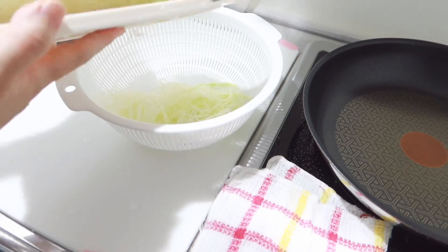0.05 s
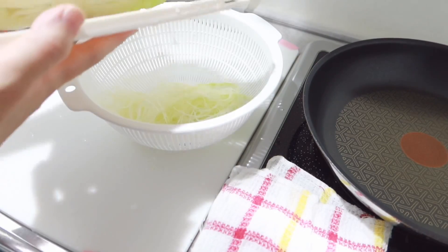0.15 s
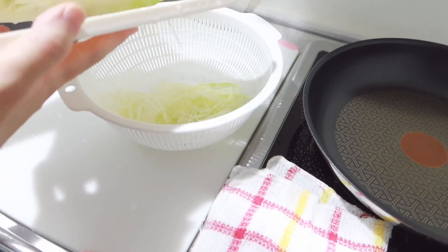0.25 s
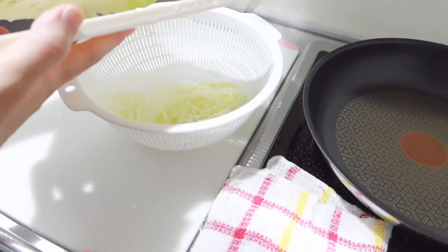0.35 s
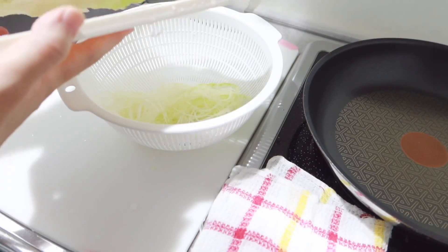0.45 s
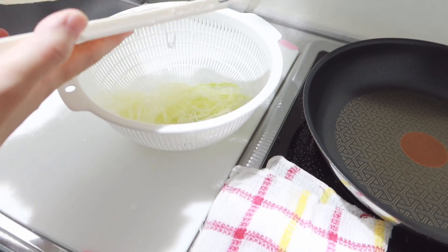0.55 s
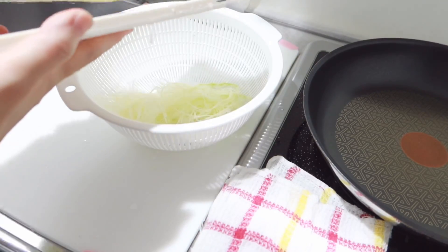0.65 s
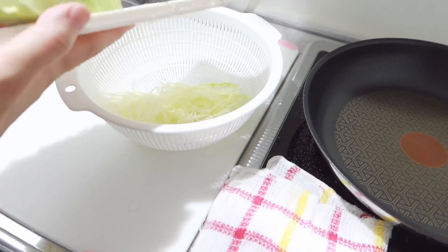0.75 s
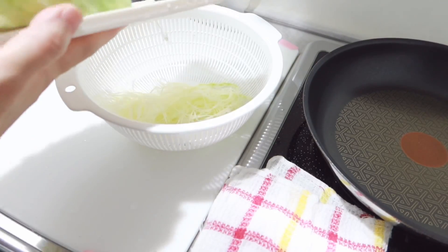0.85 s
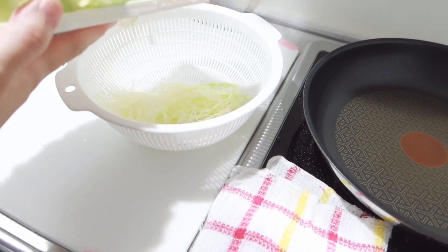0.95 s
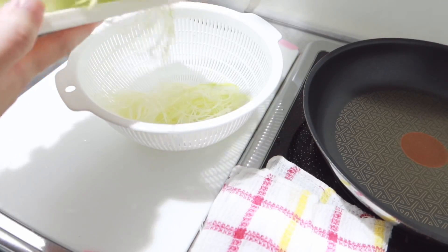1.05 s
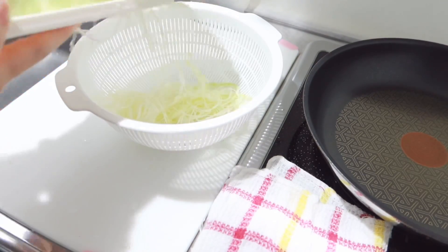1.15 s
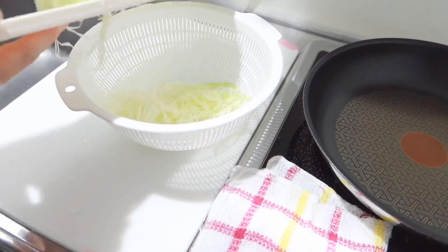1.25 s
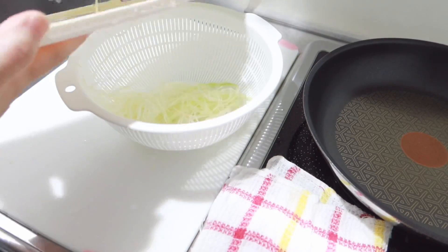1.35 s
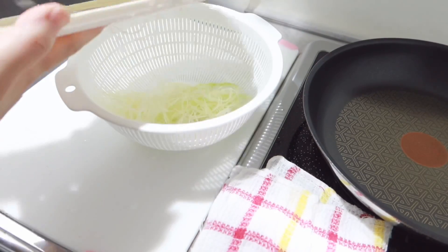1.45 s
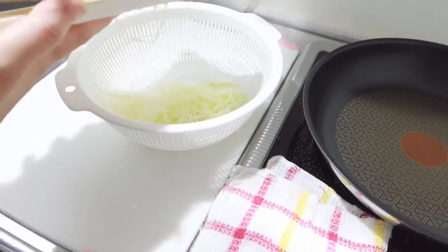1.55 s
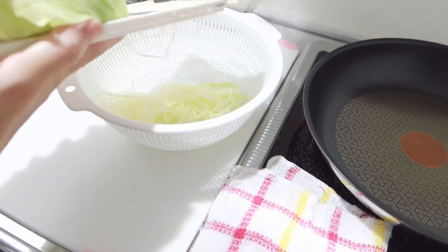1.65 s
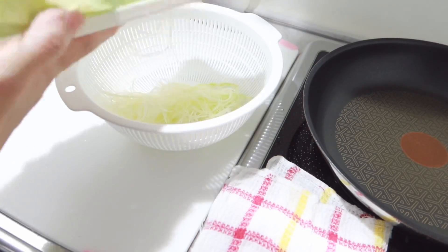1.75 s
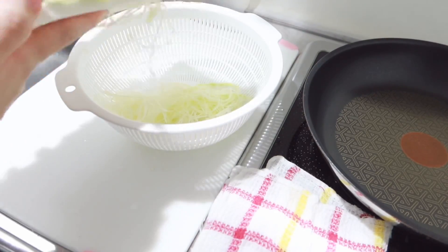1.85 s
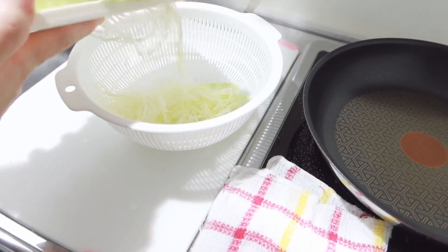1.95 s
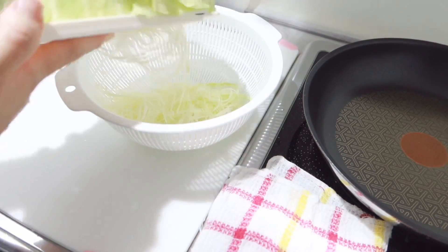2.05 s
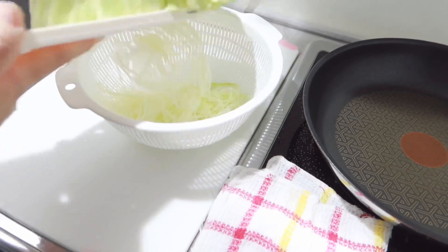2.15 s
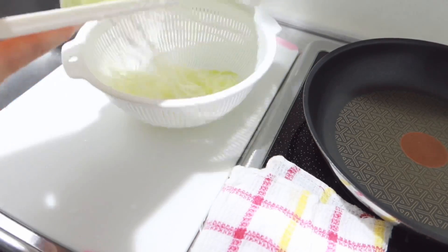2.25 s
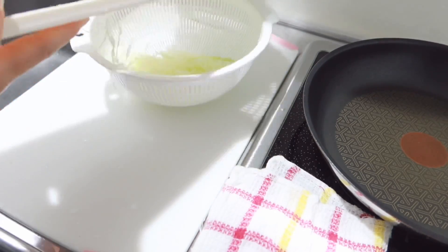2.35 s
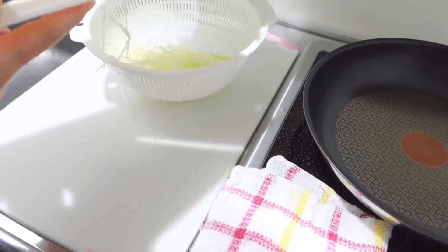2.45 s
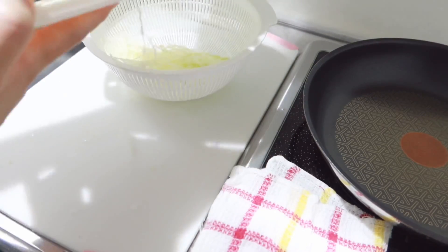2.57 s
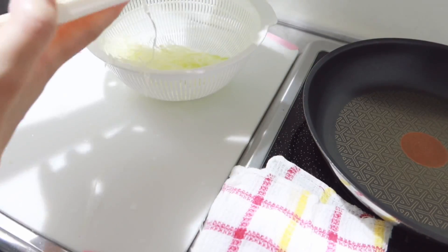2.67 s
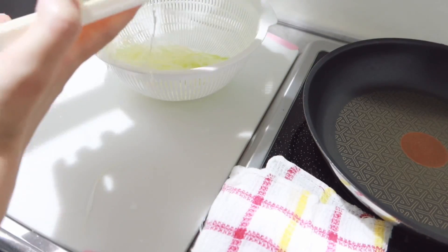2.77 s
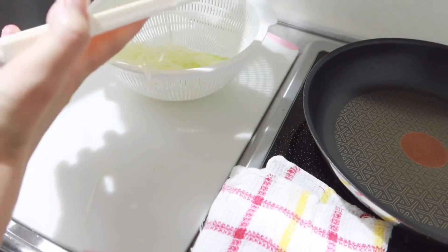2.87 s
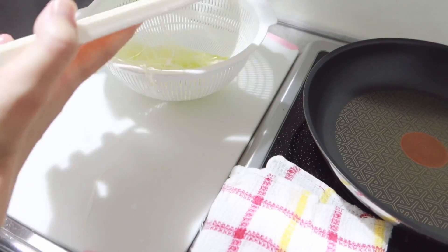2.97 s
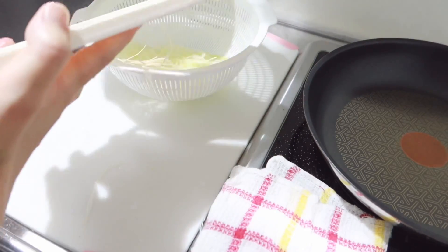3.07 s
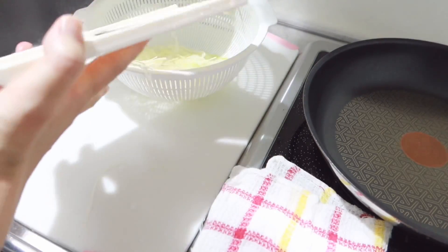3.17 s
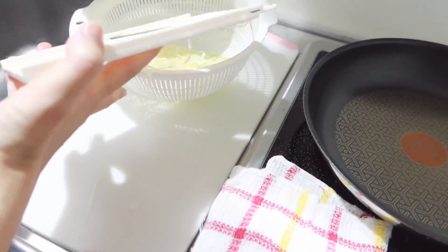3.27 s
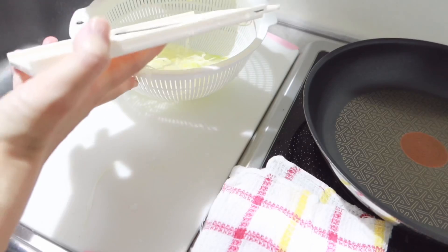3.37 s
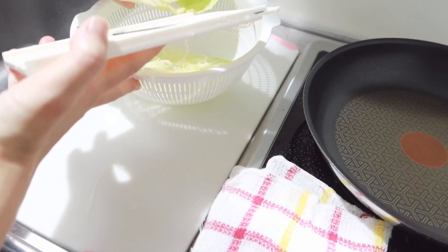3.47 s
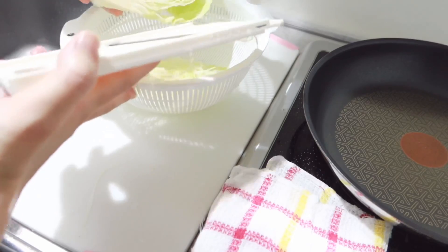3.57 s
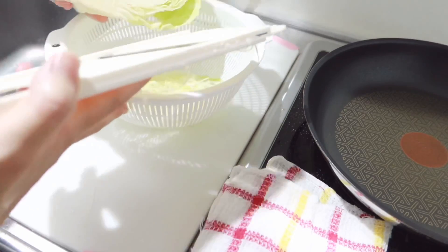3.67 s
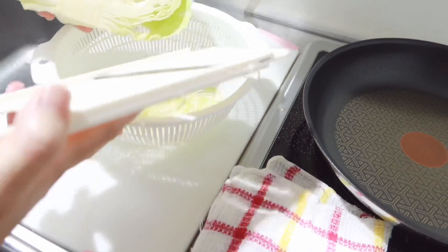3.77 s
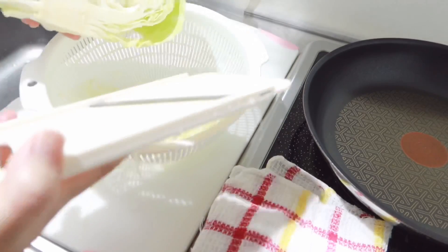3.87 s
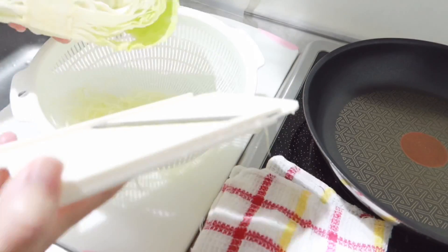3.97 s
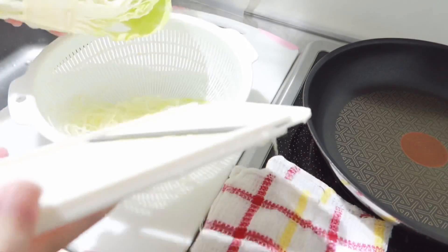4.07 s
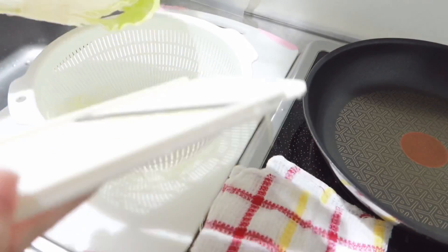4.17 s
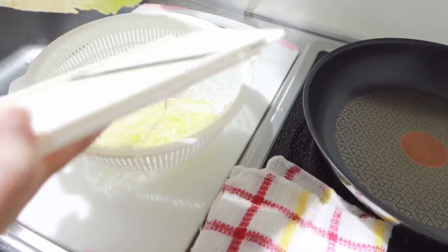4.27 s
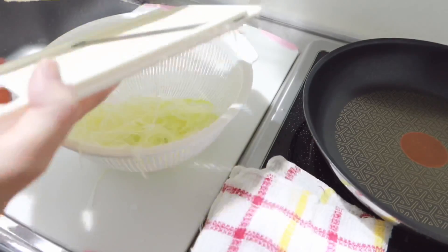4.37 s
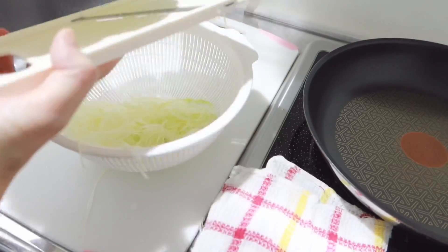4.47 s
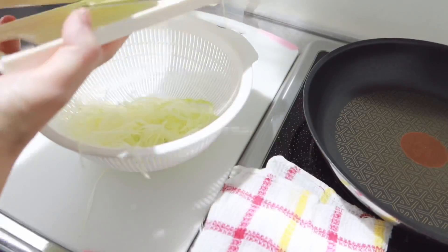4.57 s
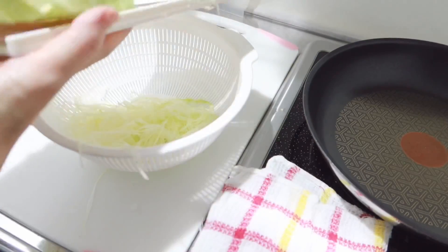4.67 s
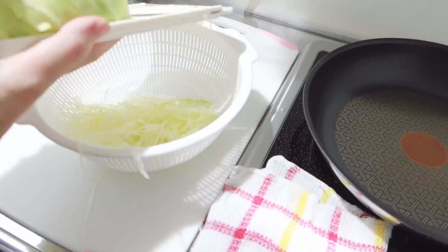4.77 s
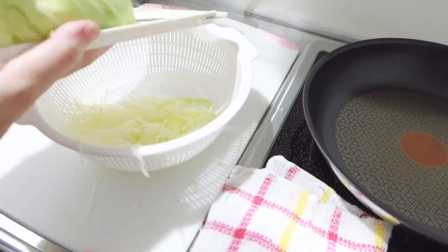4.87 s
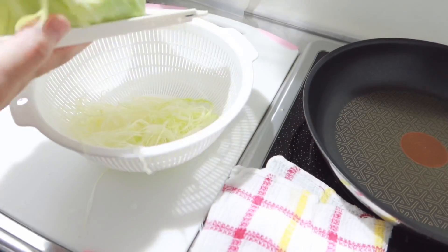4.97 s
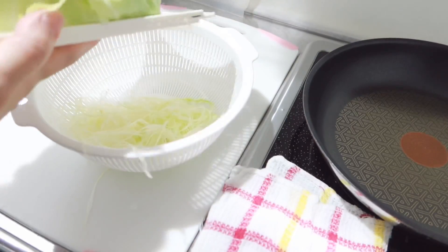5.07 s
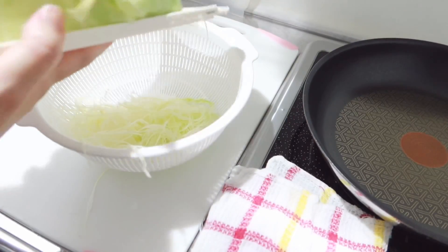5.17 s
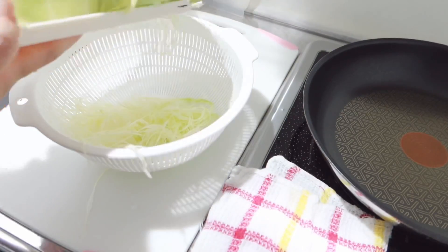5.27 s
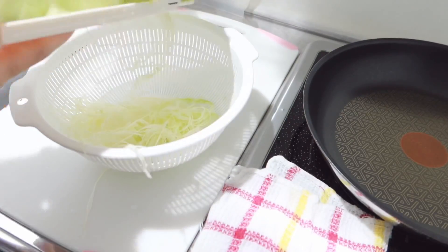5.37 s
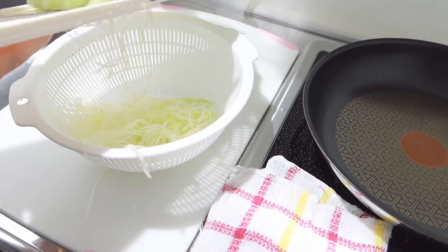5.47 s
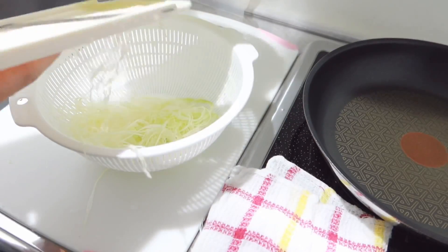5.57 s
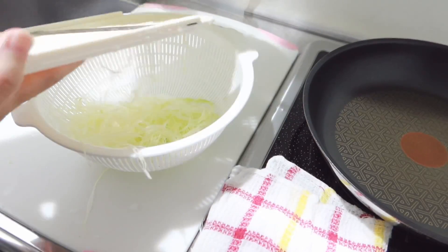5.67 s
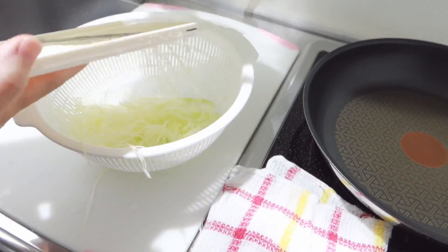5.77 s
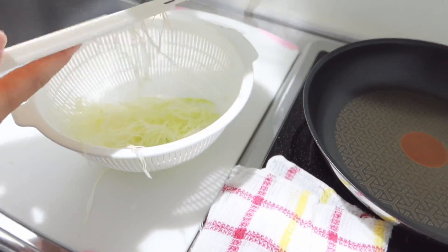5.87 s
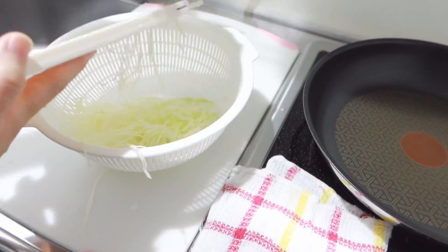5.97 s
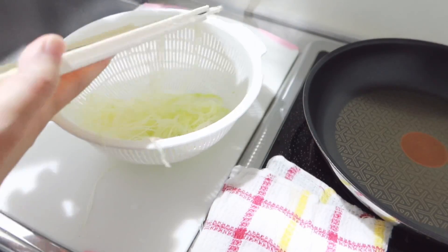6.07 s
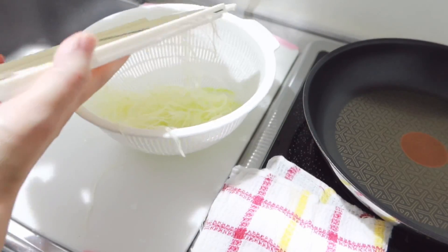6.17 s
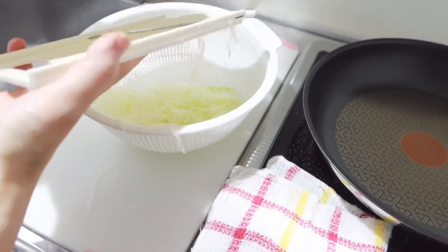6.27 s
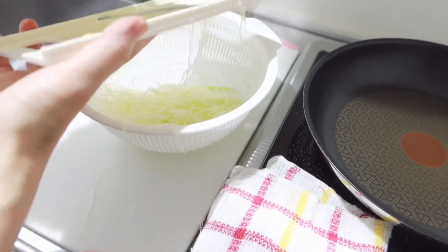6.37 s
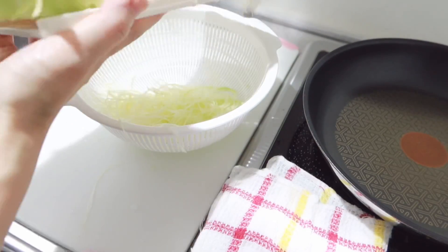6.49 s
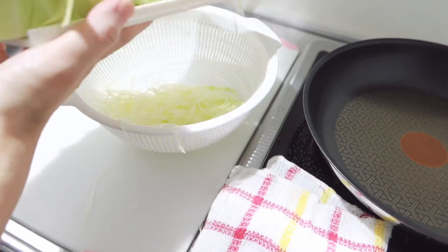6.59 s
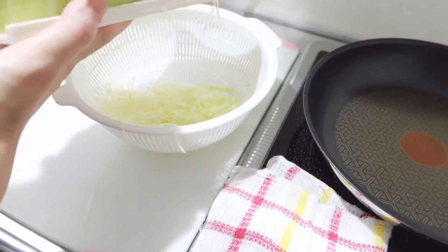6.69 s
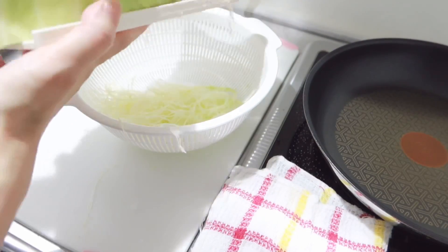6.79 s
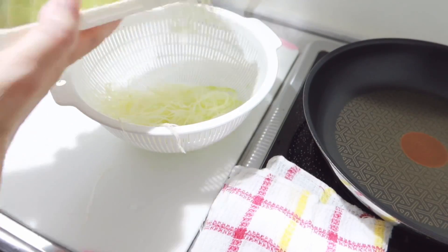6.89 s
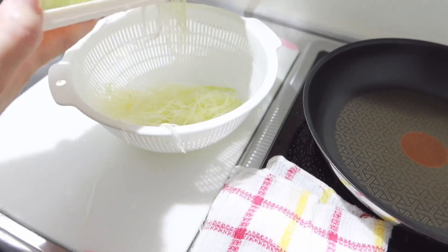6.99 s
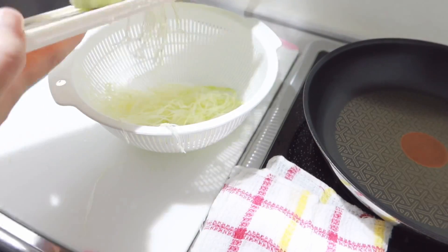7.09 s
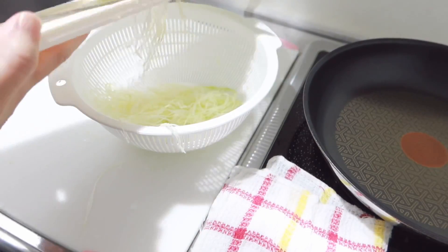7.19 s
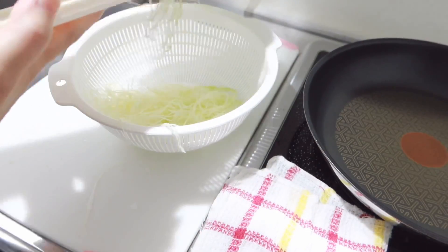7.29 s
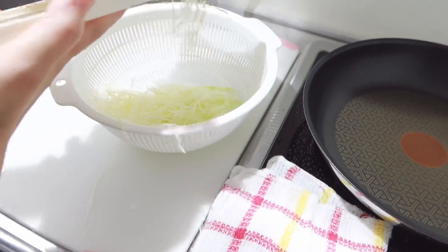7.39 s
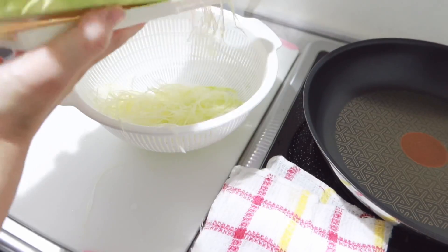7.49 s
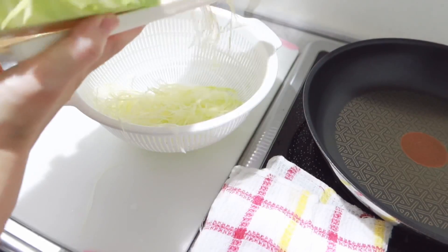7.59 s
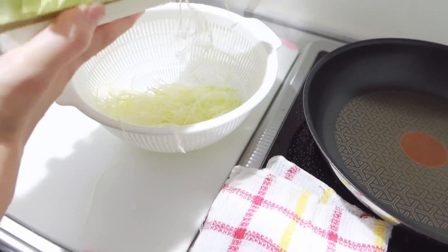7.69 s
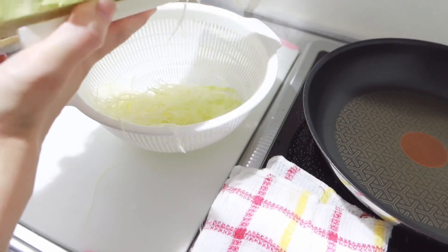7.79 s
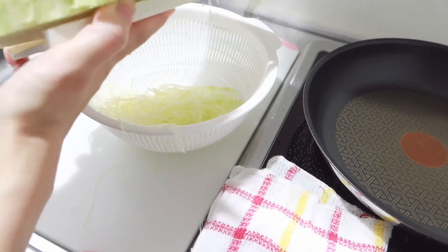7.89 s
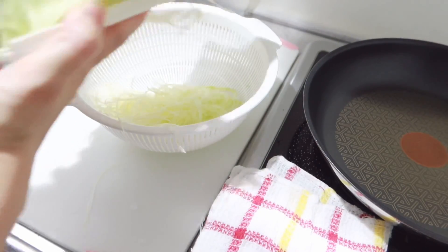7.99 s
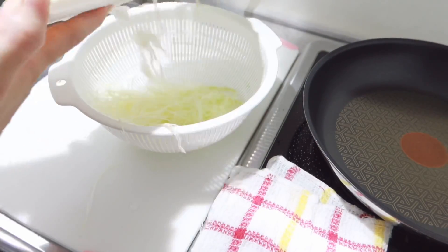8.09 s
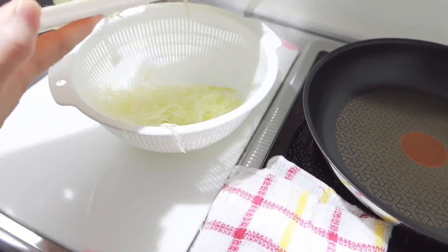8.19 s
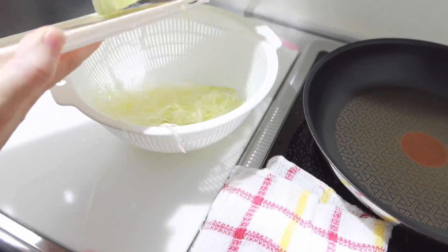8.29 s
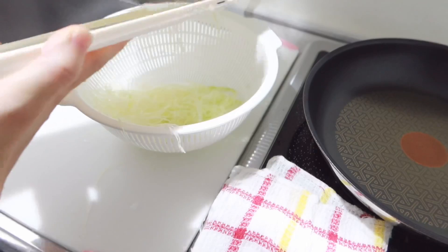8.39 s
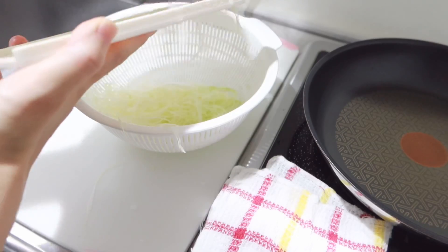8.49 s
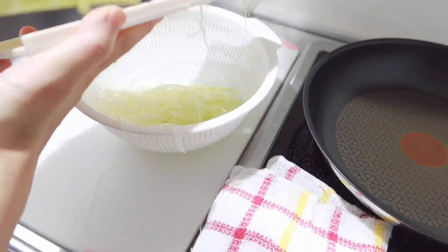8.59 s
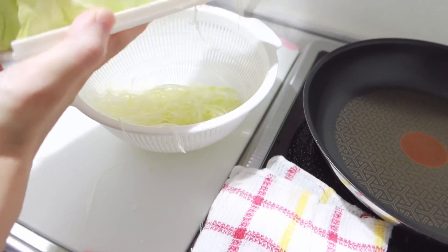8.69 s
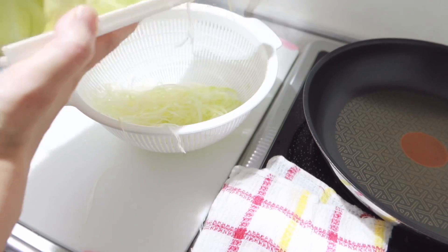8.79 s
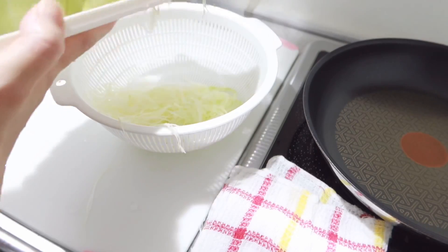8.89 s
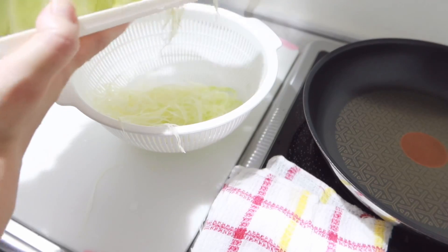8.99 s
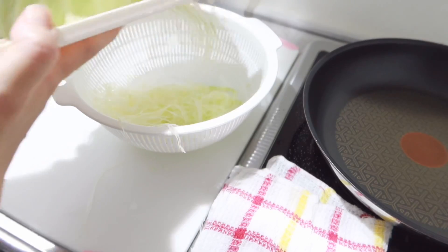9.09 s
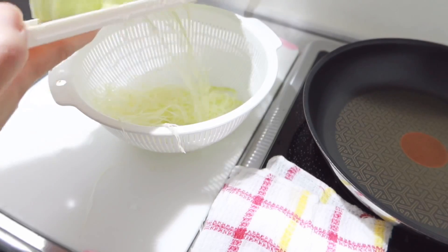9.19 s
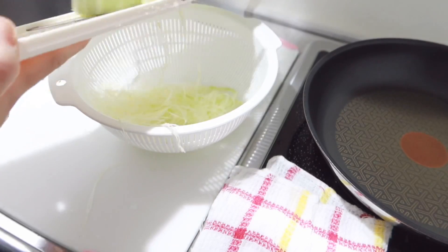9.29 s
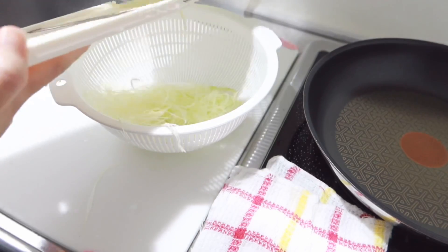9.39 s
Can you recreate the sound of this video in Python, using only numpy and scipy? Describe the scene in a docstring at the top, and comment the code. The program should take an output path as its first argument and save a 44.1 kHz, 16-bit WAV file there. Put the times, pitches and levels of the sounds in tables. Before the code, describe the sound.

Close crisp shredding of cabbage in irregular short strokes, cracks and squeaks, hollow plastic bowl slides between, in a quiet small kitchen.

```python
"""Slicing cabbage in a small kitchen

Cabbage is pushed in jerky strokes over the blade of a hand-held plastic slicer. Uneven bursts of clicks make
the tearing and hiss, and ring the slicer board dully. Leaves snap as short cracks and squeak as fluttering tones.
Now and then the plastic colander below scrapes over the counter: juddering clicks ring its bowl and rim.
A refrigerator-like hum of a few sine tones and shaped air noise fill the room."""
import sys
import numpy as np
from scipy import signal
from scipy.fft import rfft, irfft, next_fast_len
from scipy.io import wavfile
from scipy.ndimage import uniform_filter1d

SR = 44100
rng = np.random.default_rng(int(sys.argv[2]) if len(sys.argv) > 2 else 0)


def master(y):
    """Save y as 16-bit WAV."""
    cut = np.clip(np.atleast_2d(y).T, -1, 1)
    pcm = np.round(cut * 32767)  # scale
    wavfile.write(sys.argv[1], SR, pcm.astype(np.int16))


N = 416304  # length in samples

# Steady air noise. Each row: pitch in Hz, relative level in dB.
AIR_SPECTRUM = [(20, -26), (76, 1), (98, -11), (148, -6), (382, -8.5), (725, -16), (1230, -21),
                (1900, -20.5), (3000, -28), (11700, -45), (15500, -58)]
AIR_DB = -57
# How alike the air noise is at left and right. Each row: pitch in Hz, likeness (1 is the same).
AIR_LIKENESS = [(150, 1), (380, 0.8), (1000, 0.88), (2380, 0.74), (15000, 0.03)]
# Resonances in the air noise. Each row: pitch in Hz, width in Hz, lift in dB.
AIR_RINGS = [(1160, 160, 7.5), (1640, 38, 9.5)]
# Tones of the motor hum. Each row: multiple of the hum pitch, level in dB.
HUM_TONES = [(1, -63.5), (2, -68.5), (4, -74)]
HUM_HZ = 75.3
# Other faint, wavering tones. Each row: pitch in Hz, level in dB.
WAVERING_TONES = [(60, -71.5)]

# Leaf ribs that snap, and clacks of plastic in the hands.
# Each row: start in seconds, level in dB (before a common trim), pitch in Hz, time to fade by 60 dB in seconds.
SNAPS = [(0.004, -39.5, 5330, 0.086), (0.237, -41, 2390, 0.079), (0.351, -51.5, 1170, 0.12),
         (0.71, -33.5, 1590, 0.045), (0.777, -42, 2000, 0.08), (1.551, -37, 1710, 0.073),
         (1.742, -34, 550, 0.16), (1.776, -34, 1500, 0.068), (1.824, -32.5, 1200, 0.049),
         (2.014, -47, 3500, 0.061), (3.347, -49.5, 2000, 0.088), (3.987, -27.5, 1204, 0.072),
         (4.065, -38.5, 2600, 0.064), (4.295, -49, 2190, 0.03), (4.604, -50.5, 1640, 0.17),
         (4.661, -45.5, 1840, 0.17), (4.8, -35, 1500, 0.031), (4.821, -31.5, 1200, 0.09),
         (5.14, -23.5, 2540, 0.035), (5.959, -52, 4500, 0.055), (6.773, -24, 1490, 0.034),
         (7.914, -26.5, 1580, 0.27), (7.968, -26, 2730, 0.064), (8.601, -38, 2280, 0.15),
         (8.74, -27, 1790, 0.054)]
# Rings of a snapped rib. Each entry: ratio to its pitch.
SNAP_RATIOS = [.72, 1, 1.15, 2.08, 2.48]
# Leaves that squeak on the blade. Each row: start in seconds, level in dB, middle pitch in Hz,
# length in seconds, overtones in dB against the main tone, glide in octaves.
SQUEAKS = [(0.381, -53.5, 3720, 0.02, -20, -0.069), (0.876, -30, 330, 0.05, -26, 0.2),
           (1.237, -44, 1960, 0.024, -33, 0), (1.924, -49, 4250, 0.014, -30, 0),
           (1.982, -48.5, 2980, .017, -30, 0), (4.884, -38.5, 1493, 0.031, -3.5, 0),
           (4.945, -37, 3430, 0.014, -12.5, 0.04), (4.957, -32, 2100, 0.034, -4, 0.03),
           (4.978, -34.5, 2620, 0.02, -10, -0.4), (6.593, -34.5, 2360, 0.0087, -26, -0.3),
           (6.667, -37.5, 597, 0.028, -7, -0.016), (7.654, -32, 5140, 0.028, -7, -0.1),
           (8.157, -40.5, 1265, 0.042, -10, -0.035), (8.611, -32.5, 2320, 0.032, -16, -0.03),
           (9.036, -40.5, 6500, 0.014, -30, 0.13), (9.136, -38, 4410, 0.0087, -25, -0.9),
           (9.144, -32.5, 3040, 0.0094, -10, -0.25), (9.167, -39, 4880, 0.02, -9, -0.019)]

# Jerks of the cabbage over the blade. Each row: start in seconds, rise in seconds, run in seconds,
# cutting level in dB, change over the run in dB, weight on the board in dB against the cutting.
STROKES = [ (0.692, 0.0017, 0.069, -43.5, -14.5, -1.5), (0.76, 0.028, 0.083, -39.5, -9, -4),
           (0.784, 0.15, 0.24, -38, -14, -4), (1.14, 0.015, 0.11, -54, 3, 2),
           (1.546, 0.003, 0.027, -45.5, 2, -4.5), (1.587, 0.0088, 0.021, -42, -2, -5.5),
           (1.683, 0.0024, .15, -39.5, 4, -0.5), (1.85, 0.012, 0.12, -44.5, -3.5, -4.5),
           (2.052, 0.074, 0.12, -41.5, 1, -2.5), (2.22, 0.016, 0.083, -51.5, 1.5, -13),
           (4.749, 0.0029, 0.042, -44.5, -15, 2.5), (4.81, 0.03, 0.044, -44.5, -13, 3.5),
           (4.86, 0.036, 0.036, -37, -5.5, -5), (4.925, 0.067, 0.01, -38, -7, -6),
           (5.14, 0.0018, 0.051, -40, -2, 0.5), (5.19, 0.028, 0.21, -49.5, -3.5, -4),
           (5.33, 0.022, .12, -53, 2, 2), (6.414, 0.0037, 0.046, -46, -3, -4),
           (6.52, 0.011, 0.017, -40, -0.5, -4), (6.59, 0.042, 0.03, -40.5, -6, -3.5),
           (6.657, 0.008, 0.0076, -31.5, -10.5, -6), (6.774, 0.0015, 0.11, -36.5, -12, -4.5),
           (6.848, 0.032, 0.21, -56.5, 6.5, -3.5), (7.393, 0.073, 0.04, -47.5, -5.5, -5),
           (7.601, 0.001, 0.036, -41, -6.5, -2.5), (7.644, 0.022, 0.072, -33, -20.5, -6),
           (7.804, .012, 0.025, -49, 0.5, -7), (7.908, 0.026, 0.07, -32.5, -13, -4.5),
           (8.0, 0.034, 0.11, -51, 2.5, -6), (8.139, 0.049, 0.067, -48.5, 3, -5.5),
           (8.595, 0.0019, 0.022, -40, -3, -2), (8.63, 0.013, 0.063, -56, 1.5, -4),
           (8.742, 0.0022, 0.16, -46, 2, -7.5), (9.014, 0.0023, 0.032, -38.5, -6, -7),
           (9.05, 0.027, 0.2, -47, -1, -5.5), ]
STROKE_RISE_POWER, STROKE_STOP_S = 0.55, 0.019  # level grows as a power of time; fade when the push ends
# Sound of a tearing leaf. Each row: pitch in Hz, relative level in dB per Hz.
TEAR_SPECTRUM = [(410, -11), (700, -1.5), (818, -20), (1020, -0.5), (1710, 1), (4830, -6.5), (12000, -16.5),
                 (15500, -12.5)]
# Frame around the blade. Each row: pitch in Hz, width in Hz, relative level in dB.
FRAME_MODES = [(906, 40, 21.5), (1200, 13, 7), (1680, 34, 7), (2100, 600, 6.5)]
# Slicer board. Each row: pitch in Hz, width in Hz, relative level in dB.
BOARD_MODES = [(347.8, 9.9, 3.5), (410, 91, 5), (527.4, 93, 10.5), (687, 26, -4.5)]
# Lift of the treble of the bite through the scene. Each row: time in seconds, lift in dB.
TREBLE_LIFT = [(0.7, 0), (2.4, 0), (4.7, 3.5), (7.6, 1.5), (9.3, 3)]
BITE_PATCHES_DB, HISS_PATCHES_DB = 2.4, 2.6  # how much the colour shifts from leaf to leaf

# Bright ticks as the leaf edge catches the blade. Each row: start in seconds, peak level in dB.
TICKS = [(1.29, -48), (4.8255, -37), (7.726, -42), (7.8055, -33), (7.816, -31), (7.824, -33), (7.831, -34),
         (7.8715, -30), (7.892, -28), (7.907, -29)]
TICK_HZ, TICK_T60_S = 9000, 0.035  # main pitch; time for the driving noise to fade by 60 dB
# The cabbage bumps the board. Each row: start in seconds, level in dB, pitch in Hz.
KNOCKS = [(1.533, -35.5, 251), (4.801, -30, 260), (6.415, -29, 254), (8.595, -26, 455)]
KNOCK_T60_S = 0.037

# Slides of the colander. Each row: start in seconds, rise in seconds, run in seconds, rumble level in dB,
# scrape level of its feet in dB (before a common lift), boom pitch in Hz.
SLIDES = [(2.121, 0.14, 0.12, -37, -38, 211), (3.435, 0.15, 0.17, -43, -43.5, 206),
          (3.62, 0.089, 0.082, -47.5, -50.5, 243), (3.801, 0.056, 0.022, -43, -52, 157),
          (3.9, 0.094, 0.072, -40.5, -51.5, 148), (4.78, 0.11, 0.049, -41, -52, 199),
          (5.976, 0.12, 0.068, -39, -43, 223)]
RUMBLE_FADE_DB_PER_S, SCRAPE_FADE_DB_PER_S = -39, -97  # as the slide slows
SLIDE_RISE_POWER, RUMBLE_STOP_S, SCRAPE_STOP_S = 0.6, 0.05, 0.045
SCRAPE_PATCHES_DB, RIM_WANDER = 1.8, 0.025  # shifts of colour; typical sway of the rim pitch as a fraction
# Colander bowl on the counter. Each row: pitch in Hz, width in Hz, relative level in dB.
BOWL_MODES = [(321, 28, -2), (530, 34, 1.5)]
# Upper rings of the colander. Each row: pitch in Hz, width in Hz, relative level in dB.
RIM_MODES = [(985, 9.1, -1), (1170, 89, 4), (1640, 8.5, -5)]
# Grit under its feet. Each row: pitch in Hz, relative level in dB per Hz.
FEET_SPECTRUM = [(240, -0.5), (400, 4.5), (1170, -7), (1960, -6), (7670, -32), (15500, -64)]
# The colander settles. Each row: start in seconds, level in dB.
THUMPS = [(2.3, -38), (4.029, -42)]
THUMP_HZ = 64.6

# Sound off counter and walls. Each row: pitch in Hz, level in dB against the direct sound.
REFLECTED = [(100, -32), (300, -21), (1400, -25), (4000, -14), (9000, -9)]
# The left microphone port leads in the treble. Each row: pitch in Hz, lead in radians.
PORT_PHASE = [(2500, 0), (4400, .35), (7800, 1.1), (10500, 2.2), (14000, 3.1)]
PORT_WANDER_S, PORT_LEFT_DB = 19e-6, 0.5  # the lag between the ports shifts as the hands move; lift at left
# Treble of the microphone. Each row: pitch in Hz, level in dB.
MIC_TREBLE = [(11000, -1.5), (13500, -3.5), (15500, -40)]
EDGE_HZ = 15700  # little passes above this


def gain_of(db):
    """Turns decibels into a factor."""
    return 10 ** (np.asarray(db) / 20)


def evened(x):
    """Scales a signal to a typical size (rms) of 1."""
    return x / np.sqrt(np.mean(x ** 2) + 1e-20)


def read(points, hz):
    """Reads a table between its points, along log frequency."""
    f, value = np.transpose(points)
    return np.interp(np.log(hz + 1), np.log(f + 1), value)


def colour(x, spectrum):
    """Filters a sound by a spectrum in dB."""
    size = next_fast_len(x.shape[-1])
    gains = gain_of(read(spectrum, np.fft.rfftfreq(size, 1 / SR)))
    return irfft(rfft(x, size) * gains, size)[..., :x.shape[-1]]


def resonate(x, hz, width_hz):
    """A resonance of gain 1: shifts its pitch down to zero, smooths, and shifts back."""
    turn = np.exp(2j * np.pi * np.cumsum(hz * np.ones(len(x))) / SR)
    r = np.exp(-np.pi * abs(width_hz) / SR)
    smooth = signal.lfilter([1 - r], [1, -r], x / turn + 1e-18)
    return 2 * (turn * smooth).real


def body(x, modes):
    """An object rings as a sum of resonances."""
    return evened(sum(gain_of(db) * resonate(x, hz, width) / np.sqrt(abs(width)) for hz, width, db in modes))


def add(mix, s, sound):
    """Mixes a sound in at time s, in seconds."""
    part = mix[max(round(s * SR), 0):][:len(sound)]
    part += sound[:len(part)]


def pushes(start, rise, run, level_db, change_db, power, stop_s):
    """Envelopes that rise, run on with a slope and die away; overlapping ones add in power."""
    energy = np.zeros(N)
    rise, run = abs(rise) + 1e-3, abs(run) + 1e-3  # never quite zero
    for s, up, on, db, slope_db in zip(start, rise, run, level_db, change_db):
        t = np.arange(0, up + on + 12 * stop_s, 1 / SR)
        shape = np.minimum(t / up, 1) ** power * np.exp(-np.maximum(t - up - on, 0) / stop_s)
        level = gain_of(db + slope_db * np.clip((t - up) / on, 0, 1))
        add(energy, s, (shape * level) ** 2)
    return np.sqrt(energy)


def random_hits(per_s, spread_db, most):
    """Single-sample hits at random times, most of them small and a few large."""
    size = gain_of(spread_db * np.minimum(rng.exponential(1, N), most))
    return size * (rng.random(N) < per_s / SR)


def slips(per_s, spread_db, clump_db, clump_s):
    """Stick-slip clicks of uneven size that come in clumps."""
    size = random_hits(per_s, spread_db, 5)
    clumps = evened(signal.oaconvolve(rng.standard_normal(N), np.hanning(round(clump_s * SR)), "same"))
    return evened(size * rng.choice([-1., 1.], N) * gain_of(clump_db * clumps))


def shifting(x, patchy_db):
    """Patches of the spectrum swell and fade at random, so the colour keeps shifting."""
    z = signal.stft(x, nperseg=512, noverlap=384)[2]
    noise = rng.standard_normal(z.T.shape)
    patches = uniform_filter1d(uniform_filter1d(noise, 12, 0), 5, 1).T
    return evened(signal.istft(z * gain_of(patchy_db * evened(patches)), nperseg=512, noverlap=384)[1][:N])


def air():
    """Steady air and machine noise, alike at both ports mainly in the bass and middle."""
    frames, hz = N // 512 + 5, np.fft.rfftfreq(2048, 1 / SR)
    a, b, c, d = rng.standard_normal((frames, 1025, 4)).T
    same = np.clip(read(AIR_LIKENESS, hz), -1, 1)[:, None]
    left, other = a + 1j * b, c + 1j * d
    z = np.array([left, same * left + np.sqrt(1 - same ** 2) * other])
    rings_db = sum(db / (1 + (2 * (hz - f) / width) ** 2) for f, width, db in AIR_RINGS)
    z *= gain_of(read(AIR_SPECTRUM, hz) + rings_db)[:, None]
    return gain_of(AIR_DB) * evened(signal.istft(z, nperseg=2048, noverlap=1536)[1][:, :N])


def hum():
    """A motor hum of a few drifting sine tones, and narrow wavering noise beside it."""
    drift = evened(uniform_filter1d(rng.standard_normal(N), 6000))
    phase = 2 * np.pi * np.cumsum(HUM_HZ * (1 + 0.0071 * drift)) / SR
    motor = sum(np.sqrt(2) * gain_of(db) * np.sin(k * phase) for k, db in HUM_TONES)
    return motor + sum(gain_of(db) * evened(resonate(rng.standard_normal(N), hz, 3.0))
                       for hz, db in WAVERING_TONES)


def snaps():
    """A sudden broad crack that dies fast, ringing in bands about its own pitch; the board knocks with it."""
    out, t = np.zeros(N), np.arange(4000) / SR
    cracks = colour(rng.standard_normal((len(SNAPS), len(t))), TEAR_SPECTRUM)
    for (s, db, hz, t60), crack in zip(SNAPS, cracks):
        rib = body(crack, [(ratio * hz, 0.067 * hz, 0) for ratio in SNAP_RATIOS])
        sound = evened(crack) + 0.4 * body(crack, BOARD_MODES) + 0.94 * rib
        fade = gain_of(db - 8.5 - 60 * t / max(t60, 0.005))
        add(out, s, fade * sound * np.minimum(t / 0.0012, 1))
    return out


def squeaks():
    """A leaf chatters on the blade at one wavering or sliding pitch for a moment, its grip fluttering."""
    out = np.zeros(N)
    chance = rng.standard_normal((len(SQUEAKS), 2, 3000))
    for (s, db, hz, length, over_db, glide), (noise, grip) in zip(SQUEAKS, chance):
        t = np.arange(min(round(length * SR), 3000)) / SR
        # a resonance at 0 Hz only smooths the noise
        waver = 0.79 * evened(resonate(noise, 0, 0.049 * hz))[:len(t)]
        phase = 2 * np.pi * hz * np.cumsum(2 ** (glide * (t / length - 0.5))) / SR + waver
        tone = np.sin(phase) + gain_of(over_db) * (np.sin(2 * phase) + np.sin(3 * phase))
        flutter = gain_of(2.2 * evened(resonate(grip, 0, 250.0))[:len(t)])
        swell = abs(np.sin(np.pi * t / length)) ** 0.64
        add(out, s, gain_of(db) * tone * flutter * swell)
    return out


def crunch(per_s, cycles, spread_db):
    """Pieces of leaf of many sizes break and ring for a few cycles, each at one of 24 pitches."""
    pitches = np.geomspace(800., 7000., num=24)
    size = random_hits(per_s, spread_db, 4)
    piece, out = rng.integers(0, len(pitches), N), np.zeros(N)
    for k, hz in enumerate(pitches):
        turns = np.arange(1500) / SR * hz
        ring = np.sin(2 * np.pi * turns) * turns * np.exp(-3 * turns / cycles)
        ring /= np.linalg.norm(ring)
        out += gain_of(read(TEAR_SPECTRUM, hz)) * signal.oaconvolve(size * (piece == k), ring)[:N]
    return evened(out)


def slicer():
    """Fibres tear and crunch on the blade; the slips ring the frame and shake the board under the hand."""
    start, rise, run, cut_db, change_db, weight_db = np.transpose(STROKES)
    cut = pushes(start, rise, run, cut_db, change_db, STROKE_RISE_POWER, STROKE_STOP_S)
    weight = pushes(start, rise, run, cut_db + weight_db, change_db, STROKE_RISE_POWER, STROKE_STOP_S)
    tear = evened(colour(slips(8000., 2.2, 1.5, 0.017), TEAR_SPECTRUM))
    dull_tear = evened(colour(tear, [(3000, -5.0), (6000, -12.0)]))
    bite = dull_tear + 0.55 * crunch(1400.0, 22., 3.8) + 0.51 * body(tear, FRAME_MODES)
    treble = colour(bite, [(1800, -40), (3000, 0)])
    treble_gain = gain_of(np.interp(np.arange(N) / SR, *np.transpose(TREBLE_LIFT)))
    bite = bite + (treble_gain - 1) * treble
    hiss = colour(slips(7000., 2.4, 0.64, 0.0069), [(2500, -11.0), (5000, 0.0), (12000, -3.5), (15500, -6.5)])
    sliding = gain_of(-18.5) * cut ** 0.82  # the sliding hiss grows more slowly than the bite
    board = body(slips(3000., 3.03, 2.8, 0.017), BOARD_MODES)
    return cut * shifting(bite, BITE_PATCHES_DB) + weight * board + sliding * shifting(hiss, HISS_PATCHES_DB)


def ticks():
    """A sharp click, bright at the top, that also rings the frame briefly."""
    out, t = np.zeros(N), np.arange(1000) / SR
    for (s, db), noise in zip(TICKS, rng.standard_normal((len(TICKS), len(t)))):
        drive = gain_of(-60 * t / TICK_T60_S) * noise + 10 * (t == 0)
        bright = resonate(resonate(drive, TICK_HZ, 2500.0), TICK_HZ, 2500.0)
        sound = bright + 2.5 * resonate(drive, 2300.0, 570.0)
        add(out, s, gain_of(db) * sound / abs(sound).max())
    return out


def fading_tone(t, hz, db, t60_s, rise_s):
    """A sine tone that rises quickly and fades by 60 dB in t60_s."""
    return gain_of(db - 60 * t / t60_s) * np.sin(2 * np.pi * hz * t) * np.minimum(t / rise_s, 1)


def knocks():
    """The cabbage bumps the board: a compact low knock of a few cycles."""
    out, t = np.zeros(N), np.arange(4000) / SR
    for s, db, hz in KNOCKS:
        add(out, s, fading_tone(t, hz, db, KNOCK_T60_S, 0.0044))
    return out


def colander():
    """The feet judder over the counter: the bowl booms, its rim rings, grit hisses; twice it thumps down."""
    start, rise, run, rumble_db, scrape_db, pitch_hz = np.transpose(SLIDES)
    rumble = pushes(start, rise, run, rumble_db, RUMBLE_FADE_DB_PER_S * run, SLIDE_RISE_POWER, RUMBLE_STOP_S)
    rub = pushes(start, rise, run, scrape_db, SCRAPE_FADE_DB_PER_S * run, SLIDE_RISE_POWER, SCRAPE_STOP_S)
    # each boom pitch holds until the next slide
    boom_hz = pitch_hz[np.maximum(np.searchsorted(start, np.arange(N) / SR) - 1, 0)]
    # the bowl bends as it is pushed
    flex = 1 + RIM_WANDER * evened(signal.oaconvolve(rng.standard_normal(N), np.hanning(4000), "same"))
    judder = slips(2500., 0.49, 0.62, 0.014)
    bent_hz = boom_hz * flex ** 2
    boom = evened(resonate(resonate(judder, bent_hz, 130.0), bent_hz, 142.0))
    grit = slips(8000., 1.8, 1.3, 0.012)
    rim = body(grit, [(hz * flex, width, db) for hz, width, db in RIM_MODES])
    bowl = body(judder, [(hz * flex, width, db) for hz, width, db in BOWL_MODES])
    scrape = shifting(evened(colour(grit, FEET_SPECTRUM)) + 0.92 * rim + 1.28 * bowl, SCRAPE_PATCHES_DB)
    out, t = rumble * boom + gain_of(3.0) * rub * scrape, np.arange(9000) / SR
    for s, db in THUMPS:
        add(out, s, fading_tone(t, THUMP_HZ, db, 0.31, 0.0093))
    return out


def kitchen(x):
    """Direct sound at two ports, then a short tail of sparse echoes, another for each port."""
    taps = np.zeros((2, 8000))
    at = np.arange(40, 7960, 20) + rng.integers(0, 20, (2, 396))
    np.put_along_axis(taps, at, rng.choice([-1., 1.], at.shape), 1)
    taps *= gain_of(-60 * np.arange(8000) / SR / 0.13)  # the echoes fade by 60 dB in 0.13 s
    taps /= np.linalg.norm(taps, axis=1)[:, None]
    tail = signal.fftconvolve(colour(x, REFLECTED)[None], taps, axes=1)[:, :N]
    hz, t, z = signal.stft(x, SR, nperseg=128, noverlap=96)
    wander = PORT_WANDER_S * evened(signal.oaconvolve(rng.standard_normal(len(t)), np.hanning(60), "same"))
    lag = read(PORT_PHASE, hz)[:, None] + 2 * np.pi * hz[:, None] * wander
    right = signal.istft(z * np.exp(-1j * lag), SR, nperseg=128, noverlap=96)[1][:N]
    return np.array([gain_of(PORT_LEFT_DB) * x, right]) + tail


def scene():
    """Everything on the counter sounds in the kitchen, over the floor of noise."""
    return kitchen(slicer() + snaps() + squeaks() + knocks() + ticks() + colander()) + air() + hum()


def record(dry):
    """The microphone loses the deepest bass and the top treble; then a steep filter cuts off the top."""
    dry = signal.sosfilt(signal.butter(N=2, Wn=45, btype="high", fs=SR, output="sos"), dry)
    edge = signal.firwin(511, EDGE_HZ, window=("kaiser", 9), fs=SR)
    return signal.oaconvolve(colour(dry, MIC_TREBLE), edge[None], "same")


dry = scene()
out = record(dry)
master(out)
```